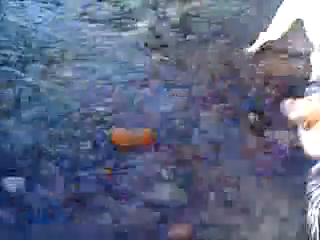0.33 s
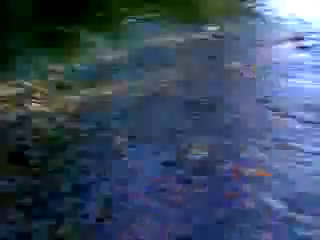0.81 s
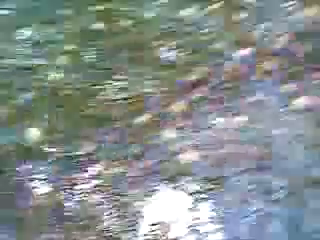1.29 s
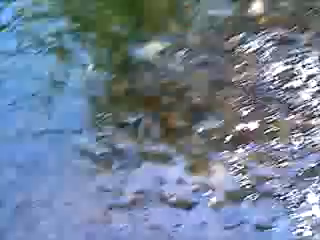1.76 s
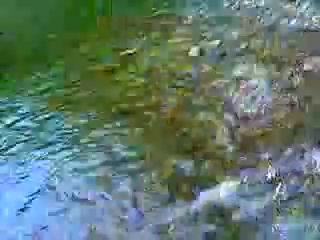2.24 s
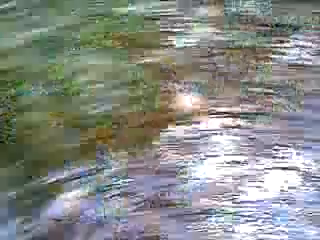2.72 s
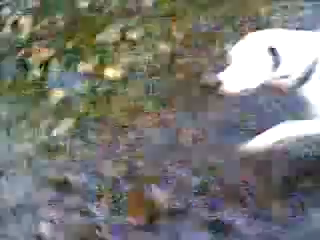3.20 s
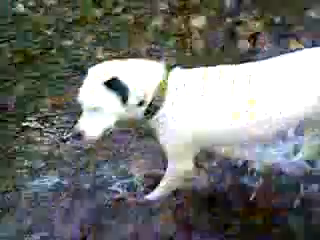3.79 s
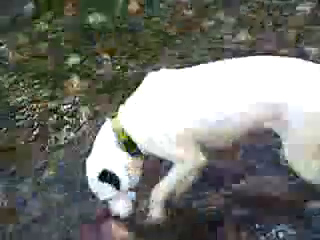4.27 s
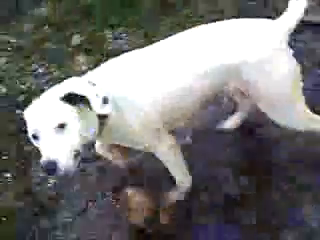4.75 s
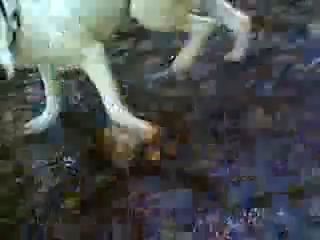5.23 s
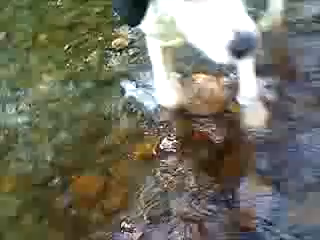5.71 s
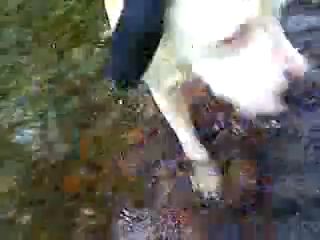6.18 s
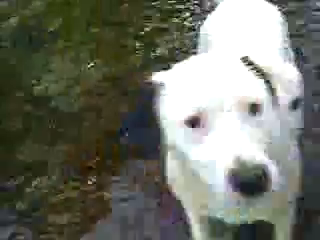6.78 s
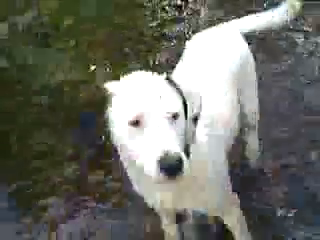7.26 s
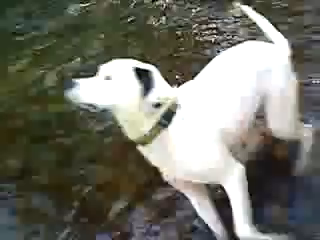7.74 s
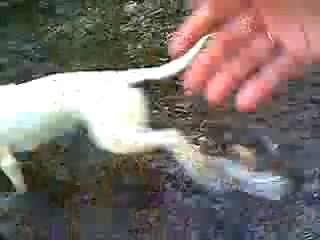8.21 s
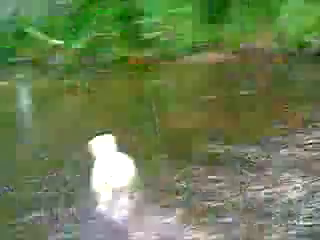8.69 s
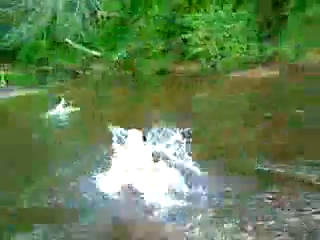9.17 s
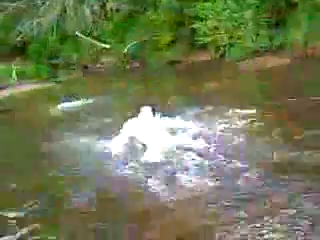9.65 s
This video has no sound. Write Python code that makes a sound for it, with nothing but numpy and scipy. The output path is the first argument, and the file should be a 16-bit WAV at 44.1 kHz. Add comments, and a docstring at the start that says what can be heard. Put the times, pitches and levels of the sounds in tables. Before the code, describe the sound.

Outdoors in a shallow stony river, dogs' legs slosh right by a small, bass-less microphone. Opening splashes ease into quieter trickling, then busy close wading builds, full of gurgles, fizzing spray and plops. The strongest, clearest plops come just after six and seven seconds. A leap brings brief, sharp, separate splashes with softer gaps, then steadier churning further away. A faint river rush runs throughout.

```python
"""A shallow stony river, where dogs wade and bound right beside a small microphone.
Their legs churn the water into gurgling bubbles (damped rising tones) and spray (fizzing noise).
Trapped air pockets plop as short notes mixed with noise, and drops slap the surface as noisier bursts.
The river rushes steadily behind, as patchy noise. The thin microphone hears almost no bass."""
import sys
import numpy as np
from scipy import signal
from scipy.fft import rfft, irfft, next_fast_len
from scipy.io import wavfile
from scipy.ndimage import uniform_filter1d, map_coordinates

SR = 44100
rng = np.random.default_rng(int(sys.argv[2]) if len(sys.argv) > 2 else 0)


def decibels_to_gain(level_db):
    """Convert a level in decibels to a linear amplitude gain (20 dB per decade)."""
    exponent = np.asarray(level_db, float) / 20
    return 10 ** exponent


def transcribe(u):
    """Save the signal u as a 16-bit wav file named by the first command-line argument.

    u: samples, shape (n,) or (channels, n), limited to [-1, 1]; the rate is SR.
    q: integer samples, one column per channel.
    """
    v = np.clip(np.atleast_2d(u).T, -1, 1)
    q = np.round(v * 32767).astype(np.int16)
    wavfile.write(sys.argv[1], SR, q)


N = 439677  # length [samples]

# colour of the river's rush: (frequency [Hz], relative level [dB])
RIVER_COLOUR = [(100, -25), (700, 1.5), (1500, 2), (2500, -16.5), (4000, -18.5), (10000, -8.5), (12000, -9)]
# how long the echo off stones and bank lasts: (frequency [Hz], time to fall 60 dB [s])
BANK_ECHO = [(500, 0.72), (2000, 0.065), (10000, 0.051)]
# bubble pitch as the legs plough deeper or shallower: (time [s], middle pitch [Hz])
GURGLE_PITCH = [(0, 1524), (.22, 1292), (.7, 1780), (1.45, 1564), (1.9, 1200), (2.6, 1444), (3.8, 1216),
                (4.1, 1655), (5.6, 1723), (5.93, 1164), (6.15, 1570), (7.1, 1367), (7.5, 1126), (8.0, 1666),
                (8.2, 1120), (8.41, 1142), (8.7, 2045), (9.0, 1410), (9.5, 1585), (9.97, 1337)]
# colour of the noise in the churned water: (frequency [Hz], relative level [dB])
CHURN_COLOUR = [(100, -34.5), (500, -1), (1000, 1), (1600, -0.5), (2200, -4), (3000, -6), (4500, -17),
                (11000, -35)]
# colour of the noise in the spray: (frequency [Hz], relative level [dB])
SPRAY_COLOUR = [(500, -17), (2000, 3.5), (3500, 5), (5500, 7), (7500, 9), (9000, 8.5), (10500, -4)]
# how far a dog is right below the microphone: (time [s], share [0-1])
CLOSENESS = [(2.9, 0.1), (3.1, 0.04), (3.7, 0.82), (7.3, 1), (7.5, 0.25)]
# extra colour of the churn right below the microphone: (frequency [Hz], gain [dB])
CHURN_CLOSE_COLOUR = [(600, -2), (850, 2), (1200, -1), (1750, 4), (2300, 0.5), (3000, -1.5)]
# extra colour of the churn further off: (frequency [Hz], gain [dB])
CHURN_FAR_COLOUR = [(700, -1.5), (1050, 0), (1500, -3.5), (2000, 0.5), (2800, 0), (3300, -9.5)]
# extra colour of the spray right below the microphone: (frequency [Hz], gain [dB])
SPRAY_CLOSE_COLOUR = [(2500, -4.5), (5300, 0), (6000, -4), (7000, -3.5), (8200, -5.5), (10000, 3.5)]
# legs wading between splashes: (time [s], churn level [dB], spray level [dB])
WADING_LEVELS = [(0.0, -53, -54), (.17, -57, -58), (0.4, -56.5, -57), (0.898, -55, -59),
                 (1.421, -53.5, -62), (1.749, -61, -62), (2.101, -61.5, -67), (2.501, -59.5, -65.5),
                 (2.9, -57.0, -58.5), (3.2, -56.5, -63), (3.442, -56, -60.5), (4.0, -53.0, -54),
                 (4.799, -48.5, -52.5), (5.281, -57, -59), (5.65, -57.5, -57.5), (6.299, -51, -54),
                 (6.899, -52.5, -54.5), (7.3, -55, -57), (7.8, -57.5, -64), (8.252, -62.5, -68),
                 (8.502, -59.5, -66.5), (8.571, -66.5, -66.5), (8.851, -57.5, -60), (9.399, -51.5, -59),
                 (9.97, -48.5, -56)]
# paw strokes that throw water; the sign of the hold is ignored:
# (time at full strength [s], hold [ms], churn level [dB], spray level [dB])
PAW_STROKES = [(.008, 20, -46.5, -53.5), (0.045, 6, -52, -50), (0.137, 7, -53.5, -52.5),
               (0.205, 25.5, -45.0, -53.5), (0.268, 3.5, -47, -52.5), (.292, 11, -48.5, -52),
               (0.5, 4.5, -51.5, -52.5), (0.646, 82, -48, -53), (0.799, 9.5, -56, -59.5),
               (0.896, 72, -54.5, -55.5), (1.027, 9, -52.5, -54), (1.118, 12, -56, -56.5),
               (1.211, 68, -61, -61.5), (1.381, -3, -50.5, -58.5), (1.502, -1.5, -58.5, -56),
               (1.951, 29, -54.5, -60), (2.08, 30, -58, -66.5), (2.17, 20.5, -57, -66.5),
               (2.267, 102, -55.5, -60.5), (2.531, 2.5, -52, -62), (2.586, 86.5, -53.5, -59),
               (2.77, 33, -48, -52.5), (3.021, 57, -55.5, -64), (3.144, 127, -58.5, -65.5),
               (3.568, 3.5, -49.5, -54), (3.67, 9.5, -59.5, -54.5), (3.784, 61.5, -52, -59.5),
               (3.853, 9, -53.5, -49), (4.0, 77.5, -48, -61.5), (4.08, 19.5, -55, -48.5),
               (4.162, 83.5, -50.5, -52.5), (4.343, 31, -51.5, -49), (4.477, 61.5, -47.5, -51),
               (4.705, 23.5, -49, -46.5), (4.798, 71, -48, -54.5), (4.9, 7.5, -49, -51.5),
               (5.018, 18.5, -55, -48.5), (5.157, 13.5, -48.5, -47.5), (5.239, 7, -54, -55.5),
               (5.329, 53.5, -55, -49), (5.431, -2, -56.5, -51), (5.523, 21.5, -48.5, -50.5),
               (5.726, 4.5, -55.5, -49.5), (5.935, 72, -51.5, -50.5), (6.151, 72, -52, -48.5),
               (6.29, 6.5, -53.5, -55), (6.364, 1, -48.5, -48.5), (6.425, 15.5, -45.5, -46.5),
               (6.5, 22.5, -53, -55), (6.589, 39.5, -47.5, -49.5), (6.745, 50, -51, -63),
               (6.87, 10, -51, -51.5), (7.0, 26.5, -44.5, -50.5), (7.17, 18.5, -47.5, -52),
               (7.235, 9.5, -41, -43.0), (7.508, 72, -50.5, -60), (7.696, 0.5, -52.5, -59.5),
               (7.919, 50, -54, -56.5), (8.08, 5.5, -54.5, -66.5), (8.103, 6.5, -50, -50),
               (8.175, 11, -59.5, -68), (8.283, 7.5, -60, -54), (8.395, 20, -55.5, -64),
               (8.425, 14.5, -58.5, -54.5), (8.606, 52.5, -49, -60.5), (8.675, 77.5, -47, -57.5),
               (8.91, 27, -52.5, -59.5), (8.989, 50, -51, -57.5), (9.127, 46.5, -47, -54),
               (9.248, 19.5, -48.5, -56.5), (9.33, 16, -52, -63.5), (9.399, 2, -46, -53),
               (9.522, 34, -53, -56), (9.641, 21.5, -47, -55.5), (9.779, 19.5, -50.5, -59),
               (9.855, 13, -56.5, -52)]
# the loudest drops slapping the surface: (time of peak [s], level [dB], centre pitch [Hz])
LOUD_SLAPS = [(0.0464, -35.5, 7960), (0.148, -39.5, 9050), (0.507, -32.5, 7740), (0.7146, -36, 7250),
              (0.735, -36.5, 5750), (0.938, -42, 6560), (1.393, -38.5, 7600), (1.443, -44, 4150),
              (1.479, -41, 9500), (1.5118, -37, 4150), (2.5434, -47, 6200), (2.788, -34.5, 3400),
              (2.8285, -42, 6290), (2.9642, -39, 6240), (3.0018, -42.5, 6200), (3.082, -40, 8500),
              (3.13, -41, 5530), (3.6706, -41, 10100), (3.804, -36, 7900), (3.9393, -35, 7500),
              (4.006, -39, 9900), (4.0815, -35, 10400), (4.176, -32, 5200), (4.4747, -36, 5460),
              (4.4986, -37, 9700), (4.8563, -35.5, 8160), (4.887, -40, 3350), (4.908, -33, 5500),
              (4.965, -41, 3640), (5.152, -35, 10000), (5.426, -37, 4130), (5.4347, -36.5, 10000),
              (5.898, -38.5, 9700), (5.943, -35.5, 3760), (5.978, -35.5, 3900), (5.982, -36, 10200),
              (6.2068, -35, 5460), (6.3551, -30, 4400), (6.373, -24, 3250), (6.4685, -40.5, 6240),
              (6.58, -33.5, 4530), (6.607, -34.5, 4150), (6.7424, -39.5, 4600), (6.875, -34.5, 9900),
              (7.0243, -36, 5900), (7.106, -40.5, 6250), (7.164, -36.5, 9400), (7.227, -33, 6660),
              (7.376, -41, 7300), (7.7063, -41, 5060), (7.957, -40.5, 3560), (8.0997, -39.5, 3770),
              (8.132, -39, 5230), (8.1504, -41.5, 4340), (8.3933, -46, 5030), (8.434, -39, 5400),
              (8.512, -48, 3520), (8.6159, -44, 5340), (8.658, -42, 4300), (8.906, -38, 9530),
              (9.392, -41, 8400), (9.408, -35, 7360), (9.517, -39.5, 6140), (9.569, -38, 6500),
              (9.621, -42.5, 3650), (9.646, -35, 2800), (9.854, -38, 7350)]
# the loudest air pockets that ring; the fade is the time to fall 7 dB:
# (time of peak [s], level [dB], pitch [Hz], fade [ms], purity [0-1])
LOUD_PLOPS = [(0.051, -36, 1190, 1.9, 0.2), (0.115, -48, 2300, 1, .3), (0.132, -36.5, 2080, 3, 0.1),
              (0.199, -32.5, 850, 1.7, 0.3), (0.29, -35.5, 1680, 4.3, 0.5), (.375, -39.5, 1180, 3.2, 0.1),
              (0.51, -29.5, 1260, 3.2, 0.24), (0.6387, -35, 970, 6.4, 0.3), (0.6922, -39, 1160, 5, 0.7),
              (0.7248, -36, 2170, 0.53, 0.97), (0.8954, -45.5, 2600, 3.6, 0.93),
              (0.948, -37.5, 1640, 1.4, 0.95), (1.046, -45, 1040, 2.2, 0.86), (1.113, -39.5, 2330, 1.5, 1),
              (1.21, -40.5, 1074, 4, 1), (1.27, -45, 1710, 7, .9), (1.366, -42, 1580, 4.7, 0.7),
              (1.38, -37.5, 2430, 2.5, 0.64), (1.504, -42, 2280, 3.3, 0.9), (1.546, -41.5, 820, 3.7, 0.8),
              (1.5915, -41, 1240, 2.3, 0.4), (2.1752, -45.5, 964, 4.4, 0.95),
              (2.218, -45.5, 2030, 2.4, 0.5), (2.271, -44, 1200, 5.3, 0.14), (2.3169, -39.5, 690, 1.3, 0.8),
              (2.525, -39, 800, 2.5, 0.67), (2.5814, -41.5, 1680, 1.8, 0.97), (2.5888, -38, 870, 2.5, 0.94),
              (2.594, -36.5, 2550, 1.4, 0.83), (2.787, -25, 1375, 2.4, 0.7), (2.853, -43.5, 2900, 3.8, 0.5),
              (2.8978, -37, 1680, 1.2, 0.85), (3.023, -44, 2530, 2.2, 0.55),
              (3.201, -41.5, 1730, 0.78, 0.9), (3.316, -45.5, 1490, 3, 0.2), (3.4423, -41, 1730, 2, 0.65),
              (3.5222, -42, 1660, 5.2, 0.7), (3.565, -34.5, 2380, 4.7, 0.86), (3.672, -43, 1240, 2.5, 1),
              (3.748, -42, 1920, 2.7, 0.94), (3.7666, -39, 1240, 5.4, 0.7), (3.7862, -42, 1270, 3.1, 0.94),
              (3.7972, -34.5, 1025, 4, 0.86), (3.824, -38, 894, 7.5, 0.2), (3.8455, -38, 950, 2.9, 0.8),
              (3.8644, -37, 1980, 1.3, 0.8), (3.989, -42, 1310, 4.3, 0.86), (4.0198, -40.5, 1716, 5.7, 1),
              (4.0512, -39, 790, 2.1, 0.98), (4.064, -37, 1380, 1.6, 0.87), (4.0822, -39, 1850, 1.7, 0.98),
              (4.217, -43, 1690, 4.3, 0.9), (4.2538, -41, 1590, 13, 0.94), (4.4195, -44, 1870, 3.4, .68),
              (4.474, -42, 2710, 7.1, 0.8), (4.488, -32, 1600, 0.79, 0.86), (4.502, -39, 650, 2.1, 0.2),
              (4.5295, -39, 1880, 3.1, 1), (4.708, -44, 1830, 3.2, 0.7), (4.7173, -37, 2090, 2.4, 1),
              (4.768, -41.5, 2200, 3.4, 0.8), (4.805, -39, 770, 2.6, 0.77), (4.862, -39.5, 817, 9.8, 0.5),
              (4.904, -35, 863, 7.3, 0.46), (4.9548, -41, 1710, 3.2, 1), (5.04, -36, 1670, 1.2, 0.84),
              (5.0682, -43, 1210, 17, 0.88), (5.16, -40, 2630, 1.8, 0.7), (5.167, -41, 713, 2.8, 0.98),
              (5.3962, -38, 1700, 1.5, 0.6), (5.347, -42.5, 1690, 4, .6), (5.43, -40, 1670, 3.3, 0.5),
              (5.5143, -39, 806, 2, 0.6), (5.534, -43, 1450, 4.4, 0.95), (5.782, -41, 1600, 2.1, 0.7),
              (5.7913, -46, 960, 4.9, 1), (5.897, -40, 1710, 2.7, 0.3), (5.943, -36.5, 965, 2.2, 0.8),
              (5.9575, -38, 965, 4.2, 0.9), (6.0925, -46, 960, 15, 0.7), (6.1478, -39, 880, 3.7, 0.9),
              (6.159, -39, 1840, 15, 0.5), (6.227, -39, 1820, 5.5, 0.05), (6.283, -35, 1890, 1.3, 0.1),
              (6.357, -35.5, 1585, 7.4, 1), (6.3748, -24.5, 1900, 0.76, 0.83), (6.389, -46, 1570, 5, 1),
              (6.4165, -31.5, 784, 4.2, 0.95), (6.428, -30, 857, 7, 0.96), (6.448, -39, 1620, 2.6, 1),
              (6.464, -41, 1640, 4, 1), (6.488, -32, 1680, 1.6, 0.84), (6.539, -44, 1190, 12, 1),
              (6.5855, -37, 1100, 2.6, 0.93), (6.595, -38, 1620, 3, 1), (6.625, -36, 1850, 1.1, 1),
              (6.761, -40, 1800, 3.1, 0.9), (6.7867, -33.5, 960, 3.2, 0.87),
              (6.8758, -37.5, 1825, 5.1, 0.8), (6.902, -42, 1960, 5.2, 1), (6.9335, -37.5, 1850, 2.3, 0.3),
              (6.9867, -37, 1600, 1.9, 0.5), (6.9952, -44, 1050, 6, 1), (7.0241, -37, 765, 3.8, 0.4),
              (7.046, -41, 1180, 3.8, 1), (7.0508, -38, 1970, 3.3, 0.9), (7.147, -41, 604, 8.3, 1),
              (7.164, -41, 1140, 3, .6), (7.172, -39.5, 1840, 8.7, 0.4), (7.225, -27.5, 1560, 3, 0.55),
              (7.245, -25, 1030, 3.9, 1), (7.252, -18.5, 1257, 2, 0.99), (7.2728, -35.5, 2500, 2.3, 0.9),
              (7.312, -42, 2090, 3, 0.93), (7.507, -42, 1060, 1.9, 0.9), (7.525, -35.5, 765, 3.5, 0.66),
              (7.554, -36.5, 2020, 3.8, 0.73), (7.709, -38.5, 1850, 2.7, 0.8),
              (7.89, -39.5, 1930, 1.4, 0.83), (7.9044, -44, 2070, 6.2, 0.98),
              (7.9197, -39, 1100, 2.7, 0.93), (8.0232, -31.5, 2120, 1.9, 0.85), (8.08, -46, 1037, 9.8, 0.8),
              (8.1105, -41, 1030, 1.3, 0.98), (8.1165, -46, 2070, 9.1, .6), (8.171, -46.5, 960, 3.7, 1),
              (8.3366, -41.5, 2640, 0.84, 0.6), (8.3967, -43, 1010, 19, 0.55),
              (8.4737, -34, 2160, 2.2, 0.88), (8.4904, -39, 1610, 2, 0.1), (8.5872, -43, 1950, 0.84, 0.74),
              (8.5882, -22.5, 1054, 1.4, 0.68), (8.6257, -33, 1960, 1.6, 0.84),
              (8.627, -36, 1170, 2.7, 0.7), (8.708, -37, 2010, 2.5, 0.4), (8.743, -41, 1940, 3.7, 0.6),
              (8.9158, -36.5, 2720, 0.55, 0.95), (8.9442, -37, 860, 1.4, 0.65),
              (9.0408, -37, 936, 1.3, 0.9), (9.0958, -46, 2790, 2.8, 1), (9.1152, -42.5, 1045, 6.7, 1),
              (9.169, -34.5, 1990, 2.6, 0.96), (9.266, -34, 950, 1.5, 0.16), (9.332, -46, 1440, 1.5, 1),
              (9.392, -37.5, 1390, 2.9, 1), (9.6025, -40, 2160, 2.1, 0.97), (9.632, -33, 960, 1.2, 0.7),
              (9.6467, -32.5, 990, 1.9, 0.6), (9.7945, -35, 885, 1, 0.94)]

RISE_MS, SETTLE_MS = 22, 52  # time a splash takes to gain and to lose 10 dB
# in a leap the paws hit and leave the water sharply: (start, end) [s], and its own rise and settling
LEAP_S, LEAP_RISE_MS, LEAP_SETTLE_MS = (7.8, 8.62), 9.7, 15
SWELL_CYCLES, PURE_CYCLES = 1.48, 2  # cycles a pocket swells for, and extra ones when it is pure
SMALL_PLOP_DB, SMALL_SLAP_DB = 3, 9.5  # middle level of small random ones, over the churn and the spray
SLAP_SWELL_MS, SLAP_FADE_MS = 1.22, 0.82  # time to gain and to lose 7 dB
DRIBBLE_DB, DRIBBLE_LASTS = -20, 2.4  # wet tail of a burst: level, and how many fades long (plus 2 ms)


def unit(x):
    """Scale a sound to an average strength (rms) of 1."""
    return x / np.sqrt(np.mean(x ** 2) + 1e-20)


def along(points, hz):
    """Read values between (Hz, value) points, with frequency on a log axis."""
    f, v = np.transpose(points)
    return np.interp(np.log(hz + 1), np.log(f + 1), v)


def wobble(rate):
    """Draw a smooth random curve with this many random points a second."""
    knots = rng.standard_normal(int(N * rate / SR) + 4)
    return map_coordinates(knots, [np.arange(N) * rate / SR])


def coloured(x, spectrum):
    """Make some frequencies stronger than others by a (Hz, dB) curve, then scale to rms 1."""
    size = next_fast_len(N + 8192)
    gain = decibels_to_gain(along(spectrum, np.fft.rfftfreq(size, 1 / SR)))
    return unit(irfft(rfft(x, size) * gain, size)[:N])


def rush(spectrum, patchy_db):
    """Rushing water: noise with random louder and softer patches in time and frequency."""
    z = signal.stft(rng.standard_normal(N), nperseg=256)[2]
    patches = uniform_filter1d(rng.standard_normal(z.shape), size=4, axis=0)
    patches = uniform_filter1d(patches, size=6, axis=1)
    patchy = signal.istft(z * decibels_to_gain(patchy_db * unit(patches)), nperseg=256)[1][:N]
    return coloured(patchy, spectrum)


def bubbles(s, gain, hz, t60, rise, attack, size):
    """Fading tones whose pitch climbs as each pocket nears the surface, added up at their times."""
    t = np.arange(size) / SR
    hz, t60 = hz[:, None], t60[:, None]
    life = t / t60
    tone = np.sin(2 * np.pi * hz * t * (1 + rise * life))
    fade_in = 1 - np.exp(-life / abs(attack))
    wave = tone * decibels_to_gain(-60 * life) * fade_in * (1 - (t / t[-1]) ** 2)  # the last factor ends at zero
    wave *= gain[:, None] / np.abs(wave).max(axis=1, keepdims=True)
    at = np.round(s * SR).astype(int)[:, None] + np.arange(size)
    return np.bincount(at.ravel(), wave.ravel(), N + size)[:N]


def swarm(count, centre, spread, cycles, sizes_db, size):
    """A random crowd of bubbles: pitches spread around a (s, Hz) centre, some louder than the rest."""
    u, g = rng.random((count, 2)), rng.standard_normal((count, 2))
    s = u[:, 0] * N / SR
    middle = np.interp(s, *np.transpose(centre))
    pitch = np.clip(middle * np.exp(spread * g[:, 0]), 480, 10500)
    gain = decibels_to_gain(-sizes_db * np.log(1 - .99 * u[:, 1]))
    t60 = cycles * np.exp(0.37 * g[:, 1]) / pitch
    return bubbles(s, gain, pitch, t60, rise=0.1, attack=0.072, size=size)


def stirring():
    """Churn and spray levels in dB: wading, with every splash rising, holding and settling on top."""
    t = np.arange(0, N / SR, .002)
    s, hold_ms, *peak_db = np.transpose(PAW_STROKES)
    ms = 1000 * (t - s[:, None])
    leap = ((s > LEAP_S[0]) & (s < LEAP_S[1]))[:, None]
    rise_ms = np.where(leap, LEAP_RISE_MS, RISE_MS)
    settle_ms = np.where(leap, LEAP_SETTLE_MS, SETTLE_MS)
    before = np.clip(-ms, 0, 900)
    after = np.clip(ms - np.abs(hold_ms)[:, None], 0, 900)
    shape = 10 ** -(before / rise_ms + after / settle_ms)  # power of each splash over time
    when, *wade_db = np.transpose(WADING_LEVELS)
    levels = []
    for wade, peak in zip(wade_db, peak_db):
        power = decibels_to_gain(np.interp(t, when, wade)) ** 2 + decibels_to_gain(peak) ** 2 @ shape
        levels.append(np.interp(np.arange(N) / SR, t, 10 * np.log10(power)))
    return levels


def scattered(count, level_db, over_db, centre, spread, swell_ms, fade_ms):
    """Random small bursts, thicker and louder where the water is stirred harder."""
    u, g = rng.random(count), rng.standard_normal((count, 4))
    chance = np.cumsum(decibels_to_gain(level_db))
    at = np.searchsorted(chance, u * chance[-1])
    middle = np.interp(at / SR, *np.transpose(centre))
    pitch = np.clip(middle * np.exp(spread * g[:, 0]), 700, 10500)
    db = level_db[at] + over_db + 0.67 * g[:, 1]
    swells, fades = swell_ms * np.exp(0.43 * g[:, 2]), fade_ms * np.exp(.5 * g[:, 3])
    return np.transpose([at / SR, db, pitch, swells, fades])


def bursts(rows, tone, sharp, rise):
    """Each burst swells, fades and dribbles on: a rising note mixed with noise around the same pitch."""
    out = np.zeros(N + 2 * SR)  # a spare second at each end
    t = np.arange(-1200, 2400) / SR  # zero at the peak
    ms = 1000 * t
    for (s, db, hz, swell_ms, fade_ms), share in zip(rows, np.clip(tone, 0, 1)):
        swell = (ms / swell_ms) ** 2 / 2 - ms / 2 / swell_ms
        shape = decibels_to_gain(-7 * np.where(t < 0, swell, ms / fade_ms))
        dribble = decibels_to_gain(DRIBBLE_DB - 7 * ms / (DRIBBLE_LASTS * fade_ms + 2)) * np.clip(ms / swell_ms, 0, 1)
        climb = 1 + rise * ms / (swell_ms + fade_ms)
        note = np.sin(2 * np.pi * (hz * t * climb + rng.random()))
        top_hz = min(hz, 10500)
        peak = signal.iirpeak(top_hz, sharp, SR)
        rough = signal.lfilter(*peak, rng.standard_normal(len(t)))
        rough = signal.lfilter(*peak, rough)  # twice, for steep flanks
        rough *= np.sqrt(np.sum((shape * note) ** 2) / np.sum((shape * rough) ** 2))
        burst = shape * (np.sqrt(share) * note + np.sqrt(1 - share) * rough) + dribble * rough
        band = signal.butter(2, [hz / 2, 2 * top_hz], "band", fs=SR)
        start = round((s + 1 + t[0]) * SR)
        out[start:][:len(t)] += decibels_to_gain(db) * signal.lfilter(*band, burst)
    return out[SR:SR + N]


def river():
    """The current over the stones: a far, patchy rush whose level drifts slowly."""
    return decibels_to_gain(-67.5 + 1.3 * wobble(0.6)) * rush(RIVER_COLOUR, patchy_db=7.0)


def bank(x):
    """A short scattered echo off stones and bank, each frequency dying at its own speed."""
    hz, t, z = signal.stft(rng.standard_normal(SR // 4), SR, nperseg=256)
    fade = decibels_to_gain(-60 * t / along(BANK_ECHO, hz)[:, None])
    tail = signal.istft(z * fade, SR, nperseg=256)[1]
    return signal.fftconvolve(x, tail / np.linalg.norm(tail))[:N]


def stirred_water(churn_db, spray_db):
    """Legs push water aside: a gurgling, crackling body and a fizzing spray, both in quick surges."""
    surge = wobble(45)  # shared by churn and spray
    gurgle = unit(swarm(count=5500, centre=GURGLE_PITCH, spread=0.4554, cycles=21.7, sizes_db=2.05, size=900))
    crackle = unit(swarm(count=1500, centre=[(0, 1960)], spread=0.41, cycles=6.9, sizes_db=0.5, size=400))
    body = rush(CHURN_COLOUR, patchy_db=2.5) + decibels_to_gain(3.5) * gurgle + decibels_to_gain(-4.0) * crackle
    churn = unit(decibels_to_gain(0.73 * surge + 0.84 * wobble(90)) * body)

    fizz = unit(swarm(count=14000, centre=[(0, 6840)], spread=.45, cycles=5.9, sizes_db=2.0, size=200))
    mist = rush(SPRAY_COLOUR, patchy_db=4.0) + decibels_to_gain(-3.0) * fizz
    spray = unit(decibels_to_gain(0.78 * surge + 2.0 * wobble(70)) * mist)

    close = np.clip(np.interp(np.arange(N) / SR, *np.transpose(CLOSENESS)), 0, 1)
    churn = close * coloured(churn, CHURN_CLOSE_COLOUR) + (1 - close) * coloured(churn, CHURN_FAR_COLOUR)
    spray = close * coloured(spray, SPRAY_CLOSE_COLOUR) + (1 - close) * spray
    return decibels_to_gain(churn_db) * churn + decibels_to_gain(spray_db) * spray


def slaps(spray_db):
    """Small drops hit the surface: very short bursts, mostly noise."""
    small = scattered(count=30, level_db=spray_db, over_db=SMALL_SLAP_DB, centre=[(0, 8200)],
                      spread=0.43, swell_ms=SLAP_SWELL_MS, fade_ms=SLAP_FADE_MS)
    loud = [(*row, SLAP_SWELL_MS, SLAP_FADE_MS) for row in LOUD_SLAPS]
    rows = np.vstack([loud, small])
    return bursts(rows, np.full(len(rows), .4), sharp=1.8, rise=0.0049)


def plops(churn_db):
    """Paws and big drops close air pockets: the purer the pocket, the clearer its note."""
    s, db, hz, fade_ms, purity = np.transpose(LOUD_PLOPS)
    purity = np.clip(purity, 0, 1)
    swell_ms = 1000 * (SWELL_CYCLES + PURE_CYCLES * purity ** 7) / hz
    small = scattered(count=35, level_db=churn_db, over_db=SMALL_PLOP_DB, centre=GURGLE_PITCH,
                      spread=0.28, swell_ms=1.7, fade_ms=5.6)
    rows = np.vstack([np.transpose([s, db, hz, swell_ms, fade_ms]), small])
    tone = np.r_[purity ** 1.63, np.full(len(small), .65)]
    return bursts(rows, tone, sharp=1.06, rise=.027)


def scene():
    """The river, the stirred water, and the plops and slaps with their echo off the bank."""
    churn_db, spray_db = stirring()
    hits = plops(churn_db) + slaps(spray_db)
    echo = decibels_to_gain(-22.5) * bank(hits)
    return (river() + stirred_water(churn_db, spray_db) + hits + echo)[None]


def band_limit(x):
    """A steep low-pass at the top of the band."""
    return signal.sosfilt(signal.butter(12, 12100, fs=SR, output="sos"), x)


def record(dry):
    """Dull echo off the hand, steep bass cut over a faint low floor that follows the sound, hiss, top limit."""
    low_hz, top_hz, dull_hz, hand_ms, hand_db = 633, 10952, 330, 0.957, -15
    dull = signal.lfilter(*signal.butter(1, dull_hz, fs=SR), dry)
    hand_echo = np.roll(dull, round(hand_ms * SR / 1000), axis=1)
    near = dry + decibels_to_gain(hand_db) * hand_echo  # humps near 1 and 2 kHz
    thin = signal.sosfilt(signal.butter(5, low_hz, "high", fs=SR, output="sos"), near)
    low_floor = signal.lfilter(*signal.butter(1, 300, "high", fs=SR), near)
    hiss = decibels_to_gain(-93) * rng.standard_normal(dry.shape)
    limit = signal.ellip(10, .5, 70, top_hz, fs=SR, output="sos")
    heard = signal.sosfilt(limit, thin + decibels_to_gain(-14.5) * low_floor + hiss)
    return band_limit(heard)


dry = scene()
out = record(dry)
transcribe(out)
```